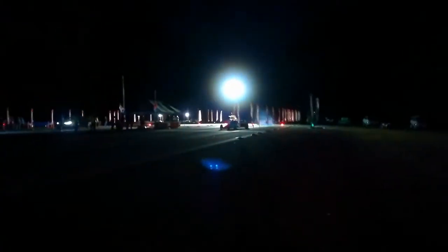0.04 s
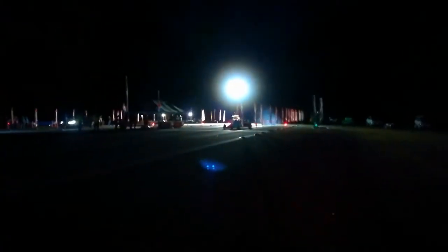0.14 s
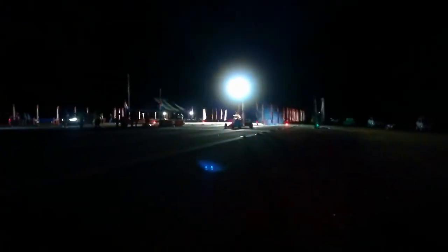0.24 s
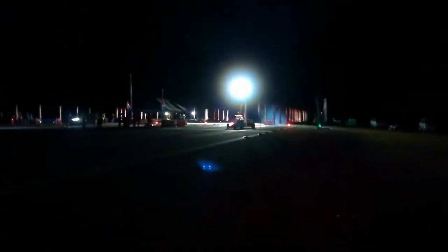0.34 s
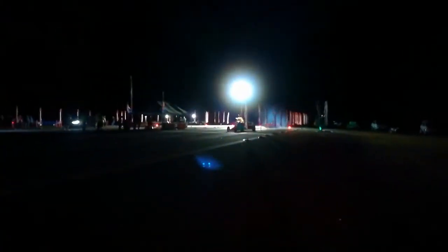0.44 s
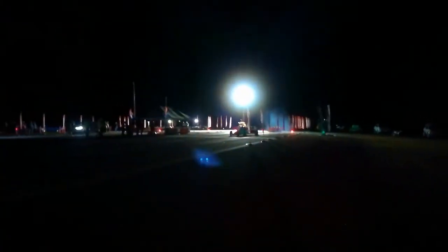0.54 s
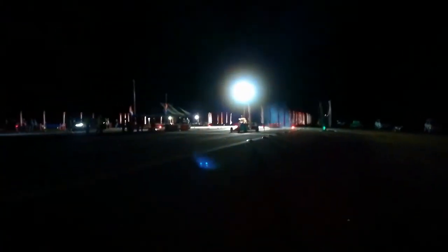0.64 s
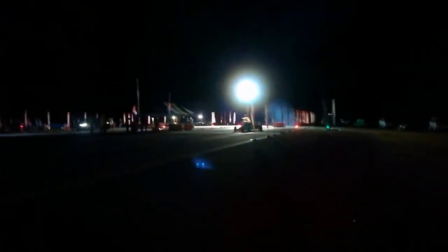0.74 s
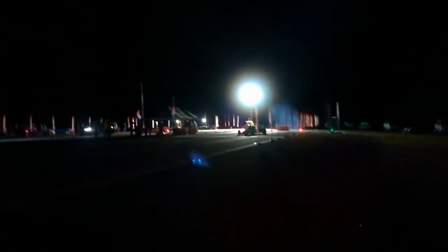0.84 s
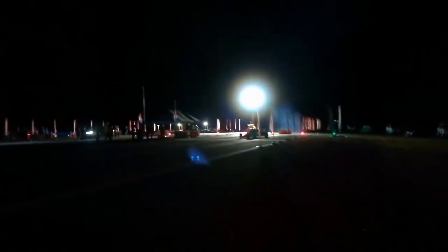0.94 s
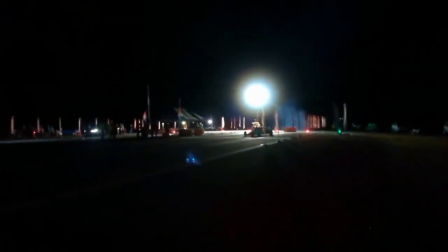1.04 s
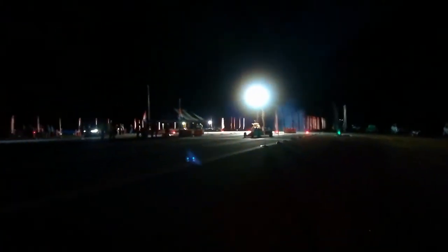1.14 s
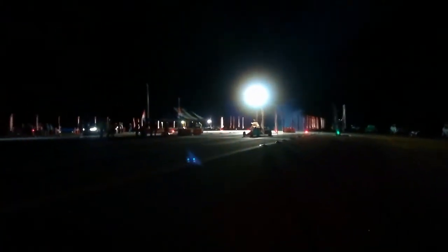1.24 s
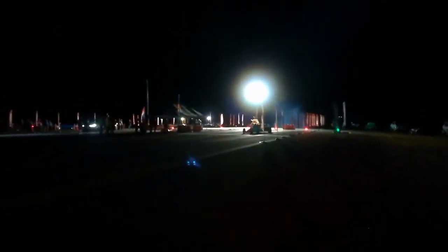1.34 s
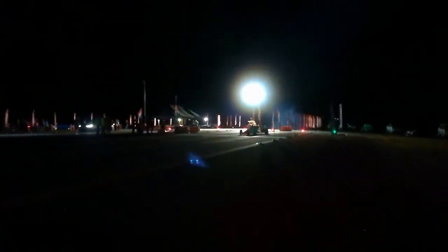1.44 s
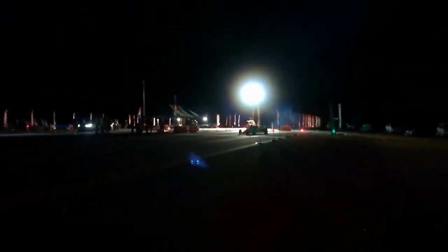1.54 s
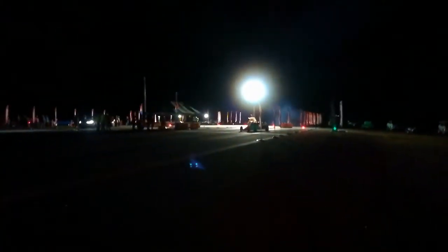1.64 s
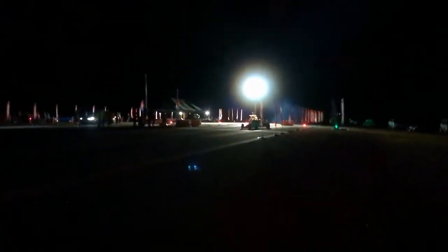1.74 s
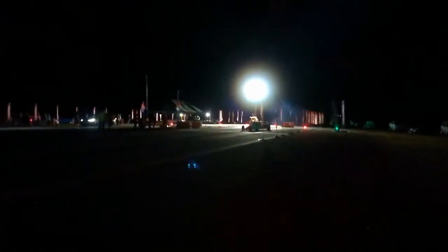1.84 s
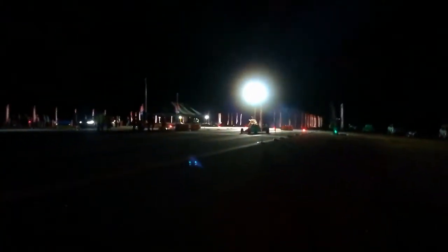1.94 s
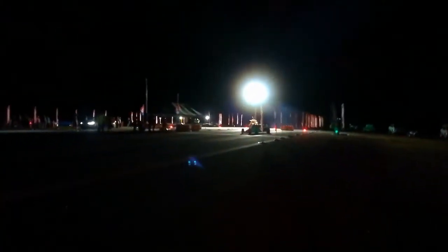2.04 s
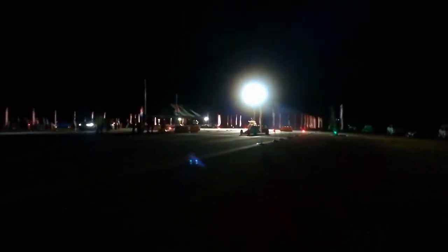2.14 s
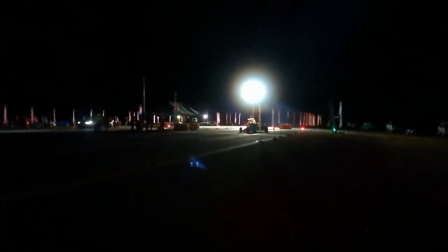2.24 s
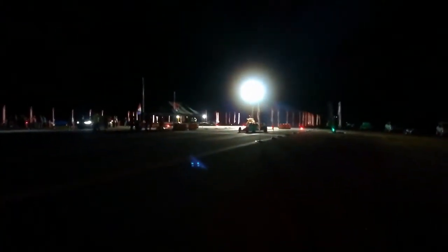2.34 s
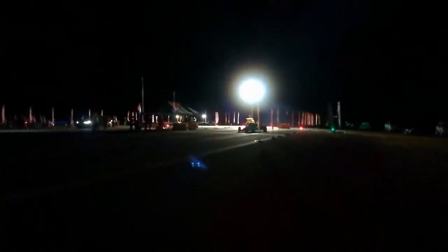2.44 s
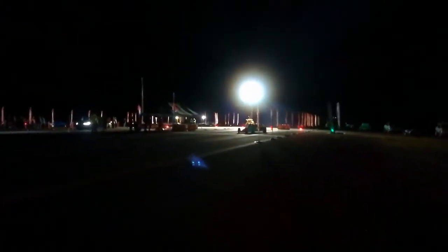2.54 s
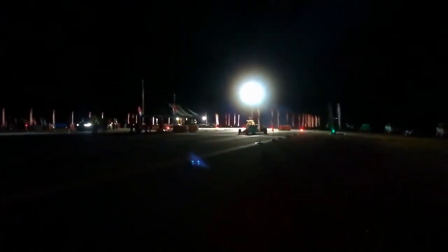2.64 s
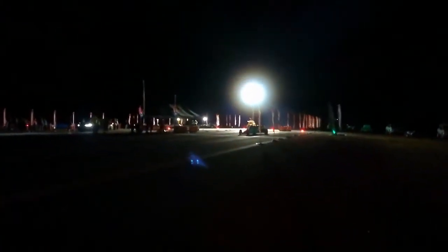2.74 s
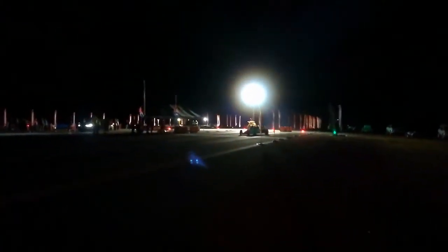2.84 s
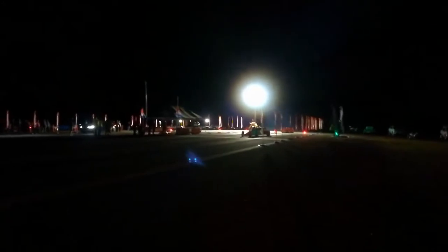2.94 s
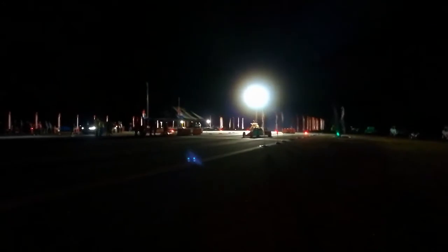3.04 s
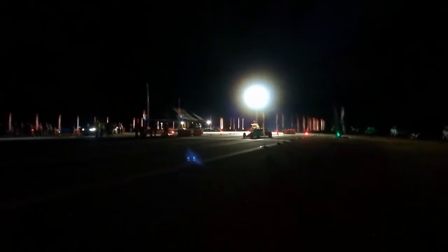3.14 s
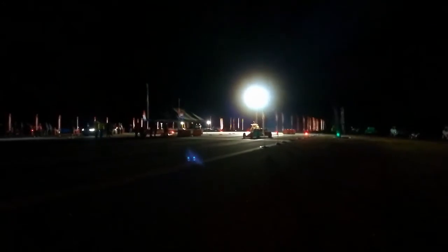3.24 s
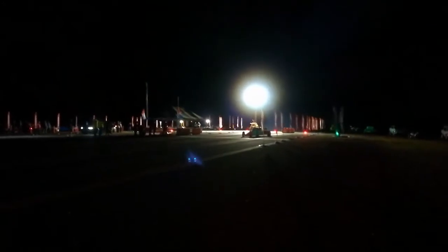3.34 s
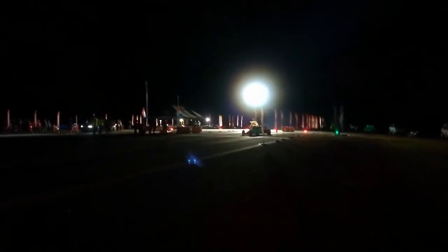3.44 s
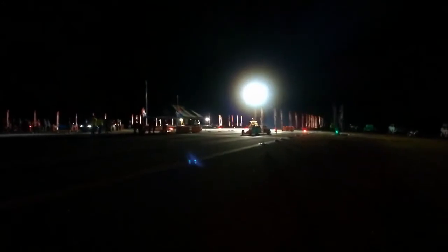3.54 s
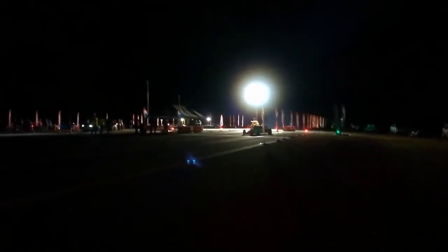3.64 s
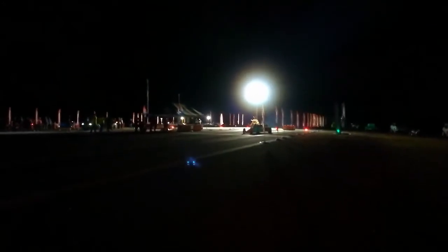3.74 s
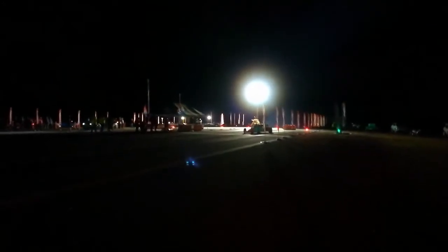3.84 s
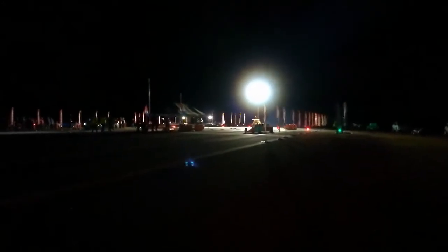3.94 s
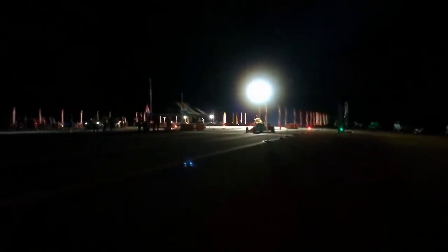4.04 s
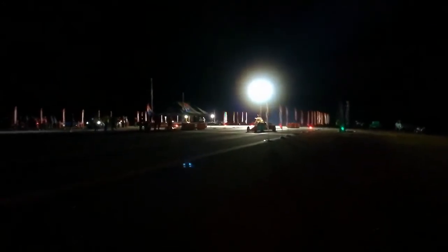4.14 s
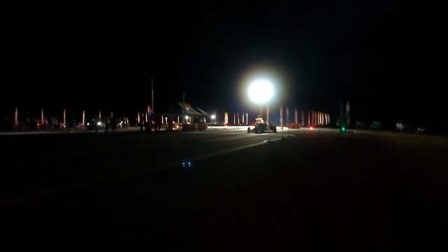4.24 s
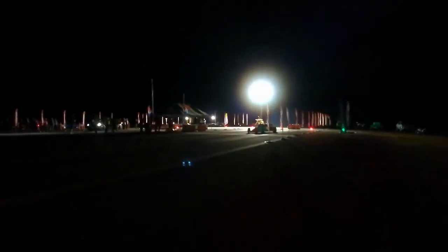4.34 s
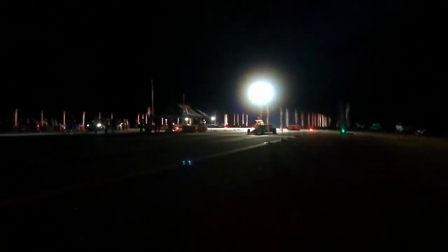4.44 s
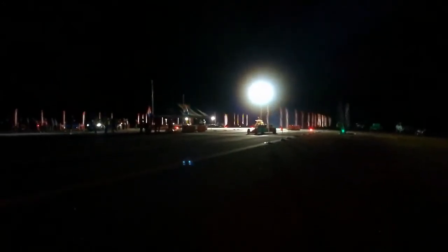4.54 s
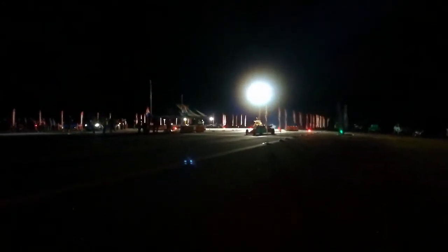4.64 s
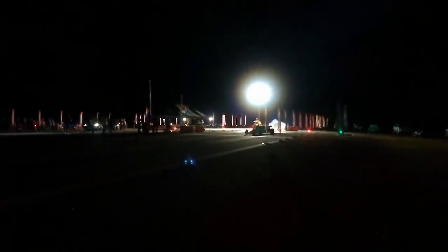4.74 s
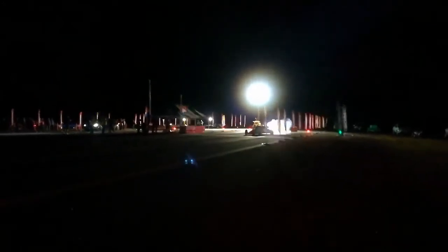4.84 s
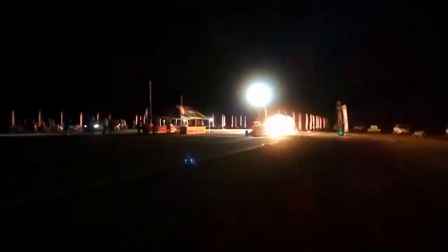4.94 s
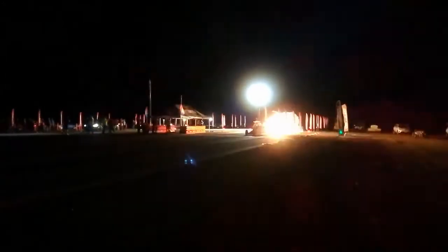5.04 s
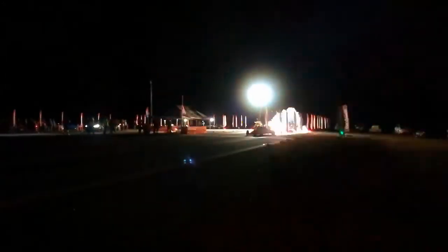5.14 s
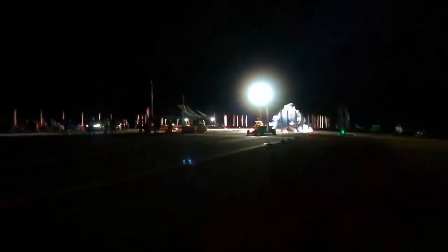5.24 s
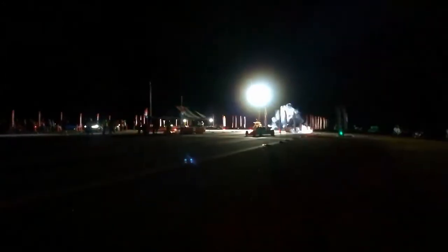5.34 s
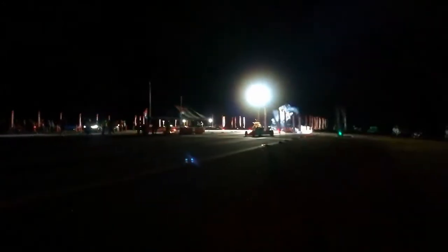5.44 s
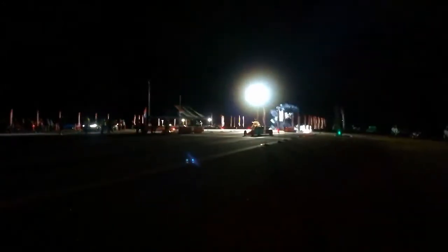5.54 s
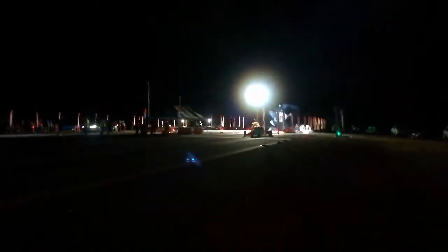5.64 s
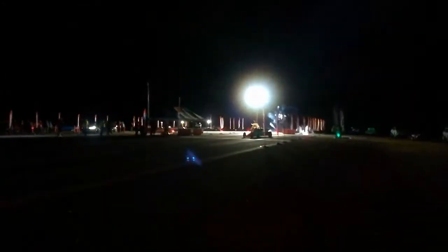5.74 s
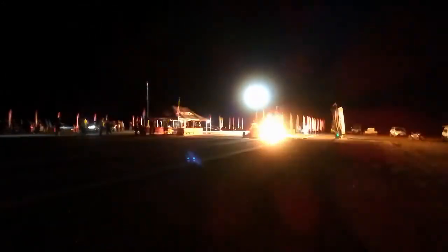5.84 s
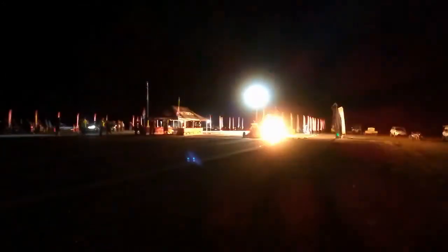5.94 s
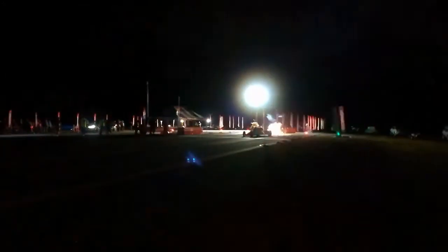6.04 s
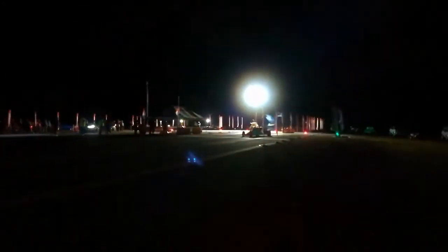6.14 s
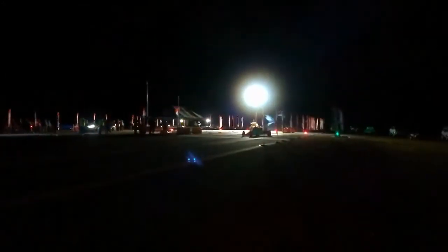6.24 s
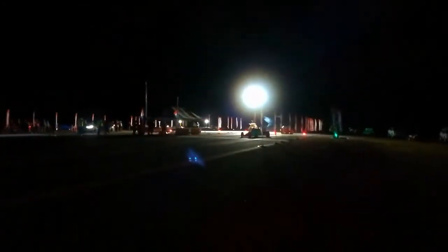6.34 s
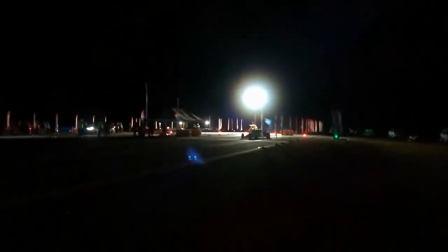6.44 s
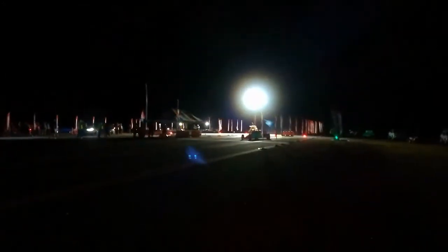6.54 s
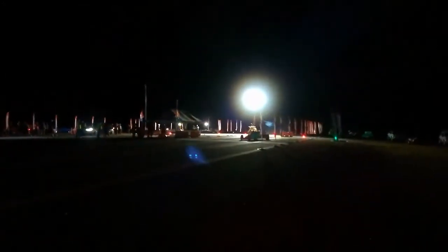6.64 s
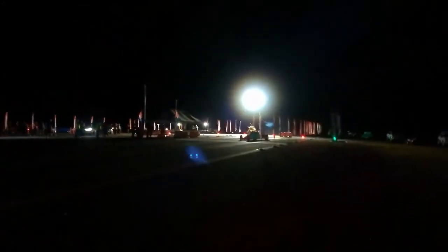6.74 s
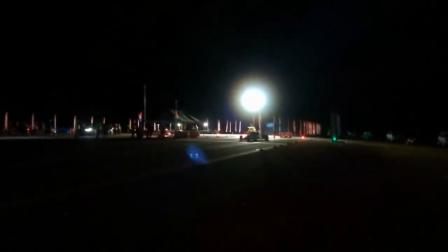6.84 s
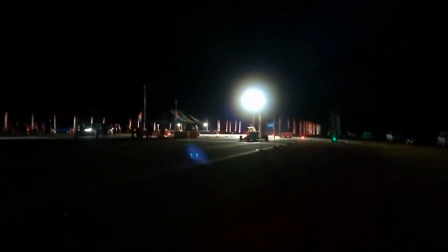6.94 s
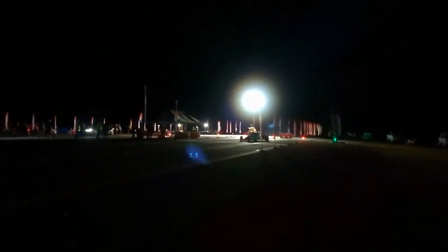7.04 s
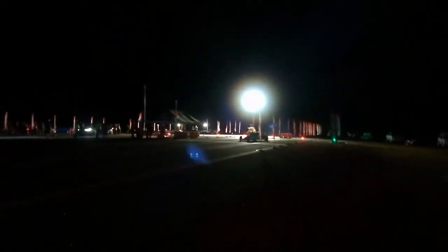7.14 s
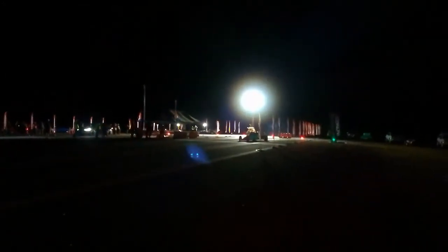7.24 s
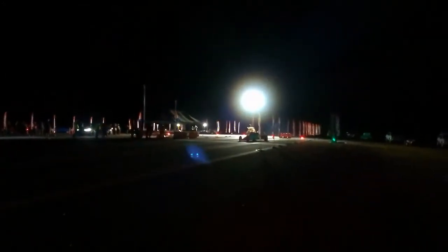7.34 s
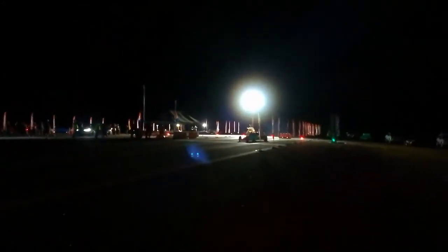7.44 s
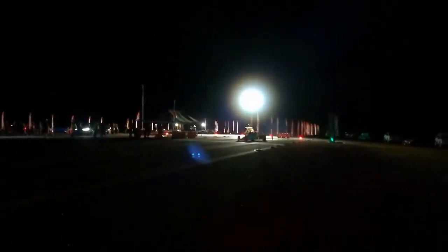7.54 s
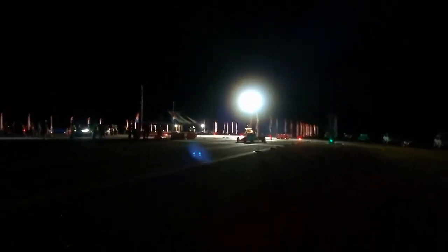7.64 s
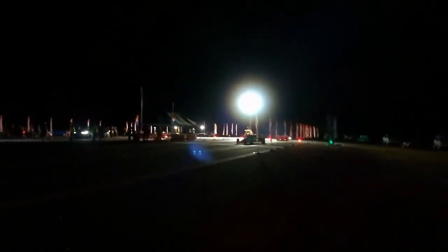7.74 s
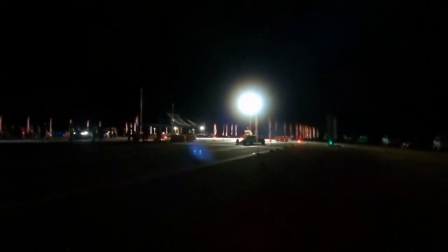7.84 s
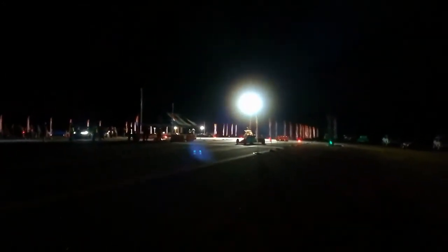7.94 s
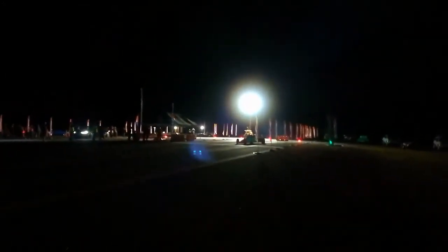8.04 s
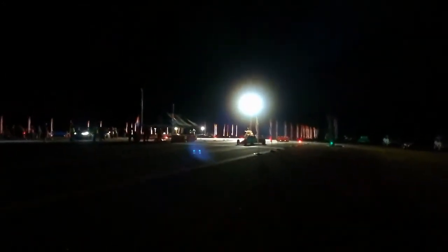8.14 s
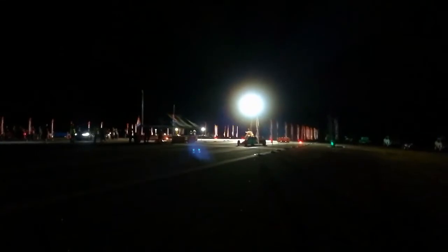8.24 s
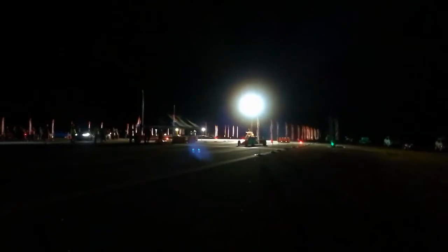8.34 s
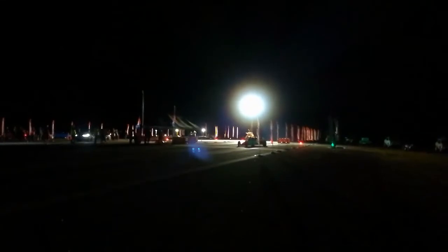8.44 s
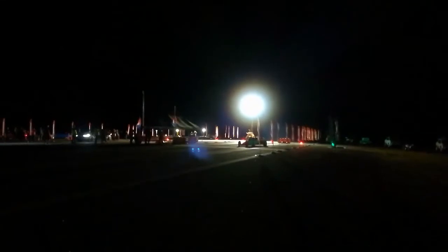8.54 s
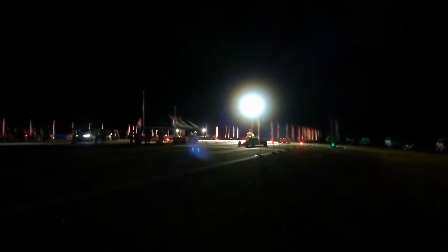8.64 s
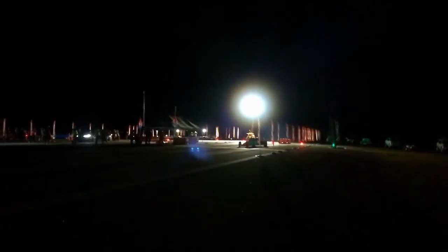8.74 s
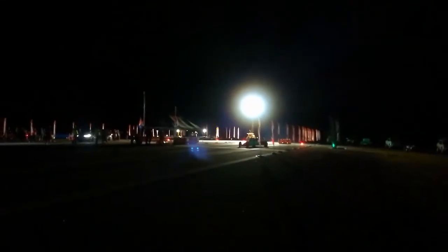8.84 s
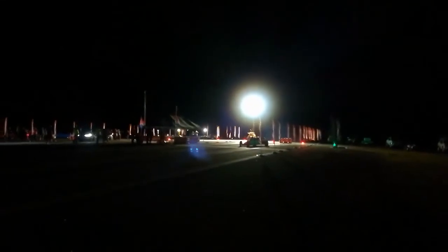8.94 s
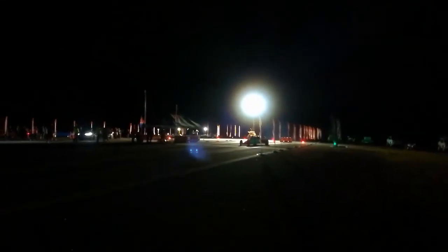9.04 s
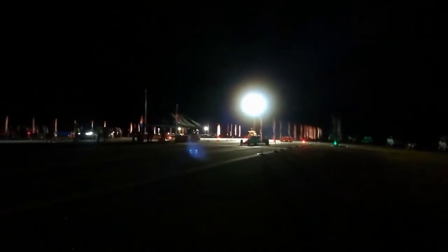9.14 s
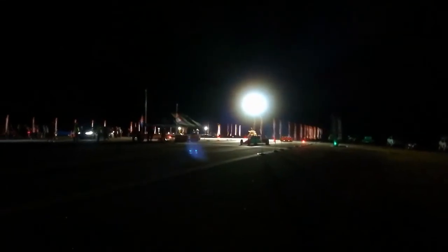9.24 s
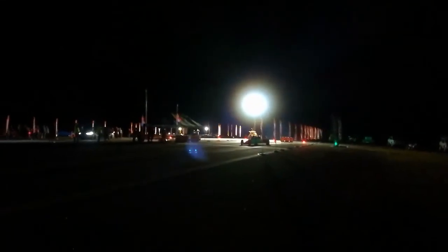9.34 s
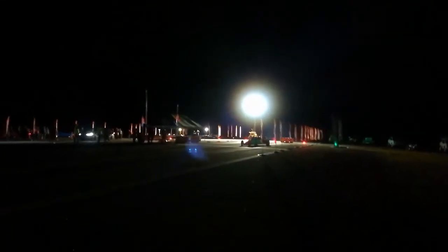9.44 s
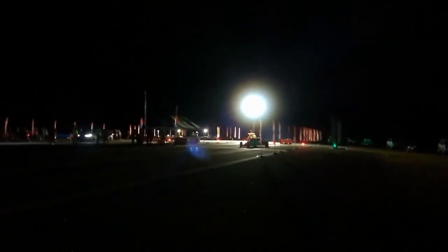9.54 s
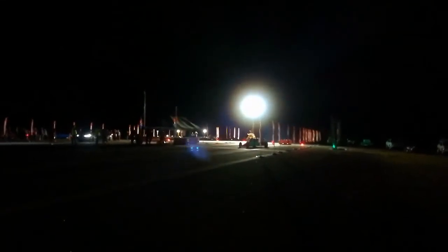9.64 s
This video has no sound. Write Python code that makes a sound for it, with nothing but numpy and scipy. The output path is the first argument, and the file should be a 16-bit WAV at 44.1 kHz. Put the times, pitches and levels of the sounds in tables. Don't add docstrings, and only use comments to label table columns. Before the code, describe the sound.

Distant jet turbine hisses and whines steadily at night, pitch creeping upward, with two short deep afterburner booms near the middle, the first overloading.

```python
import sys
import numpy as np
from scipy import signal
from scipy.fft import rfft, irfft, next_fast_len
from scipy.io import wavfile
from scipy.ndimage import uniform_filter1d

SR = 44100
rng = np.random.default_rng(int(sys.argv[2]) if len(sys.argv) > 2 else 0)


def bounce(signal):
    frames = np.transpose(np.atleast_2d(signal))
    limited = np.clip(frames, -1, 1)
    pcm = np.round(limited * 32767).astype(np.int16)
    wavfile.write(sys.argv[1], SR, pcm)


def gain_from_decibels(decibels):
    exponent = np.asarray(decibels, float) / 20
    return 10 ** exponent


N = 427769
SIZE = next_fast_len(N)
HZ = np.maximum(np.fft.rfftfreq(SIZE, 1 / SR), 1)
TIME = np.arange(N) / SR

# [t/s, shaft f/Hz]
THROTTLE = [(0, 342), (.59, 342), (1.15, 373.4), (1.58, 376), (1.81, 380.4), (2.23, 382), (2.75, 394.4),
            (3.37, 393.7), (4.02, 396.8), (4.72, 396.4), (5.88, 395.3), (7.12, 392.9), (7.51, 407.6),
            (8.02, 408.9), (8.63, 430.5), (9.7, 429.8)]
# [start t/s, depth f/Hz]
FUEL_SAGS = [
    (4.83, 8.3),
    (5.85, 10.4),
]
# [t/s, hiss level/dB, air clearness level/dB]
JET_AIR = [(0.0, -26.5, 1), (0.4, -26.5, 0), (1.08, -23, -1), (1.38, -24.5, 1), (1.73, -23, -1),
           (3.32, -28, 1), (3.4, -25.5, 0.5), (4.78, -19.5, 0.5), (5.29, -25.5, -2), (6.16, -27.5, 2),
           (7.02, -30, 1), (7.27, -28, -1), (7.38, -30, -1), (8.45, -26, 2), (8.75, -28.5, -2.5),
           (9.05, -26.5, -3.5), (9.37, -27, 1), (9.7, -26, 2.5)]
JET_ZONES_HZ = (200, 600, 1400, 4600, 10500)
# share of the hiss swings followed, level/dB at mean hiss
ZONE_FOLLOW, ZONE_DB = (.1, 0.23, .5, 1, 0.89), (-21, -24, -26, -26, -27)
HISS_MEAN_DB = -26
# [f/Hz, left level/dB, right level/dB, left phase lead/rad, scattered share level/dB]
PORT_RESPONSE = [(20, -24, -24, -0.26, -52), (100, -6.5, -6.5, -0.13, -30), (257, -10, -9.5, -0.64, -20.5),
                 (360, -22.5, -20, -.7, 5), (1140, -2, -2, 0.73, -11.5), (2409, -2, -4.5, 0.74, -10.5),
                 (2547, -6, -5.5, 4.5, -9), (2720, -5.5, -1.5, 5, -7.5), (3160, -3.5, 0.5, 5, -2),
                 (5350, 0, 1.5, 6, -1), (7530, -1, 1, 7, -5), (8880, -2.5, 2.5, 8.5, -0.5),
                 (9700, -11, 2.5, 8.5, 8), (13180, -17.5, -4, 11, 10.5)]
# [f/Hz, width f/Hz, left level/dB, right level/dB]
ECHO_NOTCHES = [(878, 180, -3, -16), (1091, 100, 6, 3.5), (1340, 69, -0.5, 5), (3140, 140, 2, 3),
                (1437, 200, -5.5, -14.5), (1878, 130, -11.5, -9), (2382, 220, -5, -14.5),
                (2923, 280, -19, -9), (1661, 250, 5, 0.5), (3996, 200, -2, -1), (4416, 240, -6, -3.5),
                (5194, 200, 2, 5), (6740, 180, -3.5, -4), (11960, 1300, 0, -10), (12700, 900, 0, -4.5)]
# [shaft f/Hz, gear level/dB, second gear level/dB, blade level/dB]
LOUD_WHINES = [(337, -3.5, -14, -16), (362, -10.5, -13.5, -9.5), (378.5, -8.5, -16, -9.5),
               (381.3, -2, -13, -11), (394.8, -2.5, -15, -11), (409.7, -7.5, -10.5, -6.5),
               (417.6, -16, -11, -4), (433, -14, -14.5, -2.5)]
LOUD_ORDERS = (20 / 3, 34 / 3, 19)
WEAK_ORDERS = (4.21, 23 / 3, 28 / 3, 31 / 3, 37 / 3, 40 / 3, 14, 15, 16, 16.44, 17, 18, 55 / 3, 20, 62 / 3,
               67 / 3, 85 / 3)
WEAK_DB = (-24, -15.5, -17.5, -17.5, -15.5, -23.5, -23, -18.5, -17, -18.5, -17.5, -15.5, -27, -30, -23.5,
           -25, -13.5)
ACCESSORY_ORDERS = (2.4, 2.63, 2.49, 2.72, 3.48, 17 / 3, 17 / 3, 25 / 3, 37 / 3)
# [level/dB against the hiss, gain level/dB, at shaft
# f/Hz, width f/Hz]
ACCESSORY_RINGS = [(-45.5, 29, 342, 2.7), (-45, 20, 342, 2), (-29.5, 14.6, 430, 9), (-30.5, 14, 388.5, 22),
                   (-27.5, 14.2, 381, 7.8), (-22.5, 9, 490, 12), (-42.5, 26, 342, 12), (-19, 8.7, 382, 8),
                   (-40, 27, 430, 12)]
# [start t/s, length t/s, rumble level/dB, rise t/s]
LIGHTINGS = [
    (4.989, .305, -19, .012),
    (5.935, 0.24, -21, .03),
]
# [f/Hz, level/dB]
FLAME_COLOUR = [(12, -48), (20, -8), (65, -7.5), (159, -1), (268, -6), (363, -23), (549, -22), (709, -25.5),
                (858, -40), (900, -27.5), (1170, -62), (1980, -120)]
# [t/s, peak level/dB, ring f/Hz, spread t/ms]
TAILPIPE_POPS = [(5.002, 0, 155, 4.2), (5.015, -3, 75.4, 10.8), (5.013, -9, 35, 11),
                 (5.014, -3.5, 170, 4.7), (5.020, -10, 228, 4.8), (5.176, -6, 105, 3.7),
                 (5.255, -16, 194, 6.8), (5.288, -15, 100, 3.6), (5.949, -17.5, 131, 5.7),
                 (5.973, -17, 150, 3), (5.992, -18, 130, 3.4), (6.010, -10.5, 150, 8),
                 (6.037, -12, 164, 8.7), (6.090, -17, 230, 6), (6.121, -17, 210, 7.9),
                 (6.152, -13.5, 111, 2.6)]
# [f/Hz, step level/dB, drop-out level/dB]
CAMERA_ROUNDING = [(100, -14, -20), (500, -10, -16), (1500, 0, -9), (2600, 2, -8), (5000, 6, -6.5),
                   (8000, 6, -7), (9500, 6, -8), (12000, 7, -7)]

SHAFT_LAG_S, SAG_DEEPEST_S = .18, .25
TOP_DB_PER_HZ, CRUISE_HZ = 0.057, 396
CALM_S, CALM_DB = 5.2, (-2, -3)
SPOOL_S, SPOOL_WIDTH_S, SPOOL_DB = 0.87, 0.23, (3, 5)
PAN_DB_PER_S, PAN_SWAY_DB = -0.08, 0.88
FLAME_CUT_S, TAIL_DB, TAIL_DB_PER_S = 0.016, -10, -94
HOP, TOP_HZ, TONE_MASKING, CLIP_DB = 940, 13000, .2, 0


def unit(x):
    return x / np.sqrt(np.mean(x ** 2))


def over_time(table):
    s, *columns = np.transpose(table)
    return [np.interp(TIME, s, c) for c in columns]


def over_hz(table):
    hz, *columns = np.transpose(table)
    return [np.interp(np.log(HZ), np.log(hz), c) for c in columns]


def white():
    return rfft(rng.standard_normal(SIZE))


def walk(rate_hz):
    grid = 32
    k = int(SR / rate_hz / grid)
    held = np.repeat(rng.standard_normal(N // (k * grid) + 2), k)
    coarse = uniform_filter1d(uniform_filter1d(held, k), k)
    return np.interp(np.arange(N) / grid, np.arange(len(coarse)), unit(coarse))


def bump(x, centre, width):
    return np.exp(-.5 * ((x - centre) / width) ** 2)


def shaft():
    hz = uniform_filter1d(over_time(THROTTLE)[0], size=int(SHAFT_LAG_S * SR), mode="nearest")
    for s, depth_hz in FUEL_SAGS:
        z = np.maximum(TIME - s, 0) / SAG_DEEPEST_S
        hz = hz - depth_hz * z ** 2 * np.exp(2 * (1 - z))
    return hz


def ports():
    left_db, right_db, lead, scatter_db = over_hz(PORT_RESPONSE)
    smooth = np.array([gain_from_decibels(left_db), gain_from_decibels(right_db)])
    share = gain_from_decibels(scatter_db) ** 2
    direct = smooth * np.exp(.5j * np.array([lead, -lead])) / np.sqrt(1 + share)
    for hz, width_hz, *depth_db in ECHO_NOTCHES:
        off = (HZ ** 2 - hz ** 2) / (HZ * width_hz)
        depth = gain_from_decibels(np.array(depth_db))[:, None]
        direct = direct * (depth + 1j * off) / (1 + 1j * off)
    scattered = np.sqrt(smooth * np.abs(direct) * share / np.sqrt(1 + share))
    return direct, scattered


def jet(zone_db, direct, scattered):
    sound = direct * white() + scattered * np.array([white(), white()])
    middle = (HZ > 3000) & (HZ < 7000)
    middle_power = np.sum(np.abs(sound.mean(axis=0)[middle]) ** 2)
    sound = sound / np.sqrt(2 * middle_power) * SIZE
    centres_hz = [100, 200, 600, 1000, 1400, 2200, 3300, 4600, 6200, 8000, 10500, 12500]
    centres = np.log2(np.array(centres_hz))
    out, shared = 0, walk(5)
    for k, centre in enumerate(centres):
        band = np.interp(np.log2(HZ), centres, np.arange(len(centres)) == k)
        mix = [np.interp(centre, np.log2(JET_ZONES_HZ), np.arange(5) == z) for z in range(5)]
        flicker_db = np.interp(centre, np.log2([200, 2000, 12000]), [.8, .8, 1.2])
        db = np.dot(mix, zone_db) + flicker_db * (walk(15) + 0.25 * shared)
        out = out + gain_from_decibels(db.astype(np.float32)) * irfft(sound * band, SIZE)[:, :N]
    return out


def whines(hz, hiss_db, clear_db, direct):
    turn = 2 * np.pi * np.cumsum(hz) / SR

    def whine(order, db, flutter_db, sway_rad):
        level_db = hiss_db + db + flutter_db * walk(9 + 4 * rng.random())
        phase = (order * turn + sway_rad * walk(20)) % (2 * np.pi) + 2 * np.pi * rng.random()
        return np.sqrt(2) * gain_from_decibels(level_db.astype(np.float32)) * np.sin(np.float32(phase))

    speed_hz, *levels_db = np.transpose(LOUD_WHINES)
    motions = [(.1, 1.0, .3), (.5, 2.2, .6), (1.5, 2.2, .35)]
    loud = 0
    for order, db, (air, flutter_db, sway_rad) in zip(LOUD_ORDERS, levels_db, motions):
        heard_db = np.interp(hz, speed_hz, db) + air * clear_db
        loud = loud + whine(order, heard_db, flutter_db, sway_rad)
    for order, (db, gain_db, at_hz, width_hz) in zip(ACCESSORY_ORDERS, ACCESSORY_RINGS):
        loud = loud + whine(order, db + gain_db * bump(hz, at_hz, width_hz), 2.8, .6)
    weak = sum(whine(order, db, 3.8, .45) for order, db in zip(WEAK_ORDERS, WEAK_DB))
    steer = direct / np.sqrt(np.mean(np.abs(direct) ** 2, axis=0))
    return irfft(rfft(loud, SIZE) * steer + rfft(weak, SIZE) * direct, SIZE)[:, :N]


def flame(s, length_s, db, rise_s):
    late_s = TIME - s - length_s
    cut = np.clip(late_s / FLAME_CUT_S, 0, 1)
    fall_db = TAIL_DB * cut + TAIL_DB_PER_S * np.maximum(late_s, 0)
    return np.clip((TIME - s) / rise_s, 0, 1) * gain_from_decibels(db + fall_db)


def afterburner():
    roar = unit(irfft(white() * gain_from_decibels(over_hz(FLAME_COLOUR)[0]), SIZE)[:N])
    out = sum(flame(*row) for row in LIGHTINGS) * roar
    out = out * gain_from_decibels(1.5 * walk(30))
    for s, db, hz, ms in TAILPIPE_POPS:
        near = slice(int((s - .04) * SR), int((s + .04) * SR))
        t = TIME[near] - s
        out[near] += gain_from_decibels(db) * np.cos(2 * np.pi * hz * t) * bump(1000 * t, 0, ms)
    return out


def scene():
    hz = shaft()
    hiss_db, clear_db = over_time(JET_AIR)
    zones = np.array([db + share * (hiss_db - HISS_MEAN_DB) for share, db in zip(ZONE_FOLLOW, ZONE_DB)])
    zones[:2] += np.outer(CALM_DB, TIME > CALM_S)
    zones[:2] += np.outer(SPOOL_DB, bump(TIME, SPOOL_S, SPOOL_WIDTH_S))
    zones[4] += clear_db + TOP_DB_PER_HZ * (hz - CRUISE_HZ)
    direct, scattered = ports()
    turbine = jet(zones, direct, scattered) + whines(hz, hiss_db, clear_db, direct)
    pan_db = PAN_DB_PER_S * (TIME - TIME.mean()) + PAN_SWAY_DB * walk(3)
    turned = gain_from_decibels(np.array([1, -1])[:, None] * pan_db / 2)
    bass = signal.sosfilt(signal.butter(1, 1500, fs=SR, output="sos"), turbine)
    return bass + turned * (turbine - bass) + afterburner()


def squeeze(x):
    n, k = np.arange(2 * HOP), np.arange(HOP)
    window = np.sin(np.pi * (n + .5) / (2 * HOP))
    cosines = np.cos(np.pi / HOP * np.outer(k + .5, n + .5 + HOP / 2))
    basis = window * cosines * np.sqrt(2 / HOP)
    halves = np.pad(x, ((0, 0), (HOP, 2 * HOP - N % HOP))).reshape(2, -1, HOP)
    sides = halves[:, :-1] @ basis[:, :HOP].T + halves[:, 1:] @ basis[:, HOP:].T
    widths = np.clip(.06 * np.arange(60) ** 1.7, 4, 32)
    edges = np.unique(np.minimum(np.cumsum(widths).astype(int) - 4, HOP))
    band = np.searchsorted(edges, k, side="right") - 1

    def rotate(pair):
        return np.array([pair[0] + pair[1], pair[0] - pair[1]]) / np.sqrt(2)

    def level(pair):
        return (np.add.reduceat(np.abs(pair) ** .9, edges[:-1], axis=2) / np.diff(edges)) ** (1 / .9)

    def beside(levels):
        return np.roll(levels, 1, axis=1), np.roll(levels, -1, axis=1)

    paired = level(rotate(sides)).prod(axis=0) < level(sides).prod(axis=0)
    as_mid = paired[:, band]
    coef = np.where(as_mid, rotate(sides), sides)
    own = level(coef)
    peak = np.maximum.reduceat(np.abs(coef), edges[:-1], axis=2)
    loud = own.max(axis=0)
    mask = np.maximum(loud, 0.47 * np.maximum(*beside(loud)))
    mask = np.maximum.reduce([mask, *beside(TONE_MASKING * peak.max(axis=0))])
    supply_db = 1.4 * rng.standard_normal((len(loud), 1))
    supply_db = supply_db + 4.5 * uniform_filter1d(rng.standard_normal(loud.shape), size=4, axis=0)
    mask = np.where(paired, mask, np.sqrt(own * mask)) * gain_from_decibels(supply_db)
    mask = mask[:, :, band] + 1e-9
    hz, step_db, drop_db = np.transpose(CAMERA_ROUNDING)
    bin_hz = k * SR / 2 / HOP
    step = mask * gain_from_decibels(np.interp(bin_hz, hz, step_db))
    limit = mask * gain_from_decibels(np.interp(bin_hz, hz, drop_db))
    kept = (np.maximum(own, peak / 3)[:, :, band] > limit) & (bin_hz < TOP_HZ)
    coef = np.trunc(coef / step + .4 * np.sign(coef)) * step * kept
    frames = np.where(as_mid, rotate(coef), coef) @ basis
    out = np.zeros_like(halves)
    out[:, :-1] += frames[:, :, :HOP]
    out[:, 1:] += frames[:, :, HOP:]
    return out.reshape(2, -1)[:, HOP:HOP + N]


def roll_off(x):
    return signal.sosfilt(signal.butter(12, 14360, fs=SR, output="sos"), x)


def record(dry):
    mix = np.clip(squeeze(dry), -gain_from_decibels(CLIP_DB), gain_from_decibels(CLIP_DB))
    return roll_off(mix)


dry = scene()
out = record(dry)
bounce(out)
```